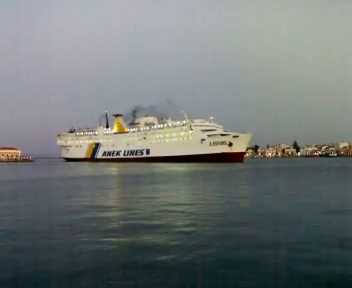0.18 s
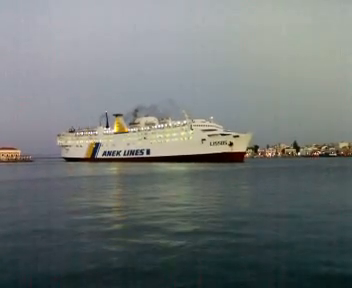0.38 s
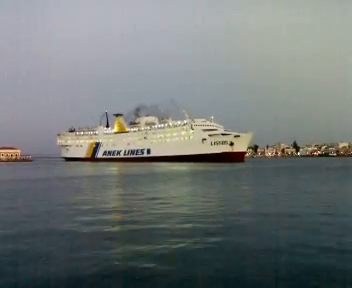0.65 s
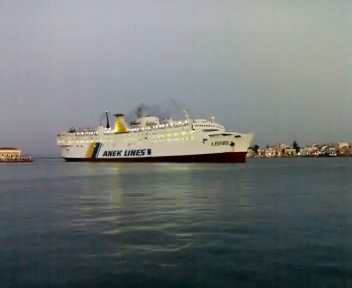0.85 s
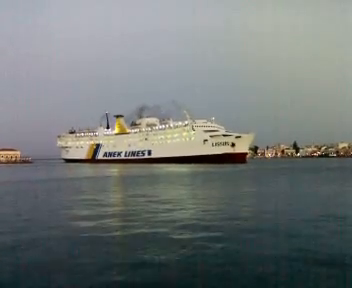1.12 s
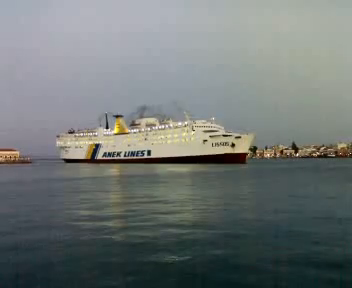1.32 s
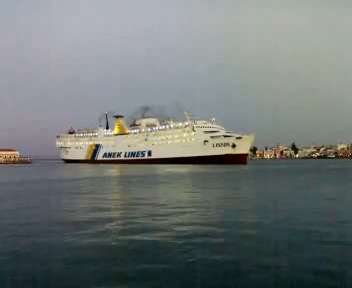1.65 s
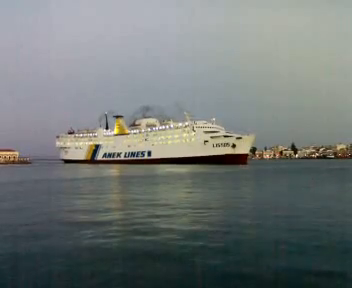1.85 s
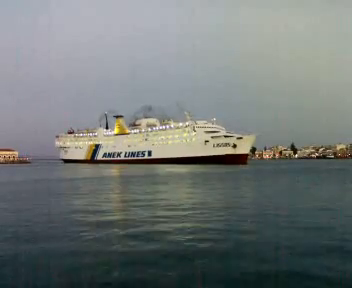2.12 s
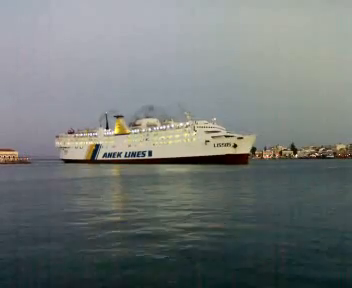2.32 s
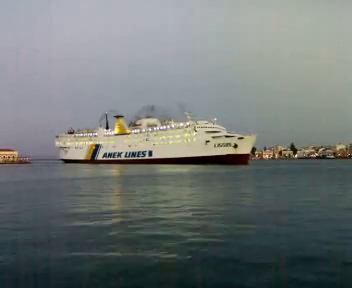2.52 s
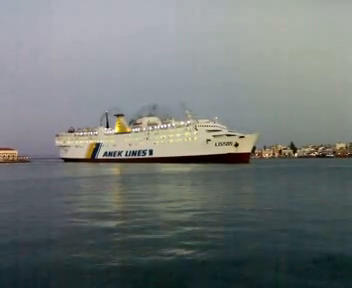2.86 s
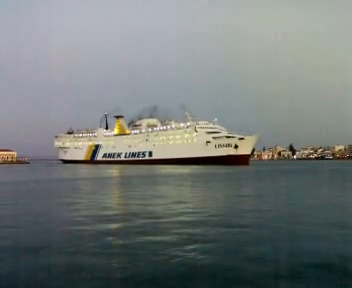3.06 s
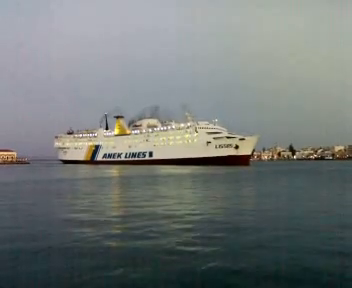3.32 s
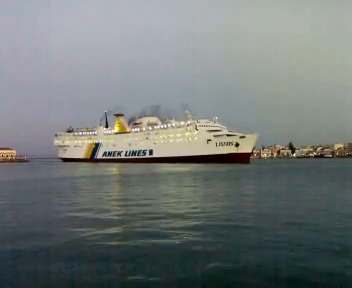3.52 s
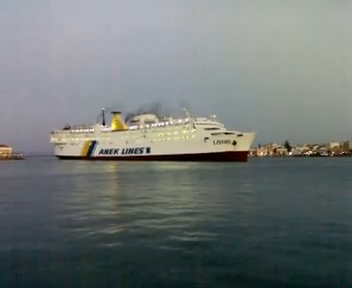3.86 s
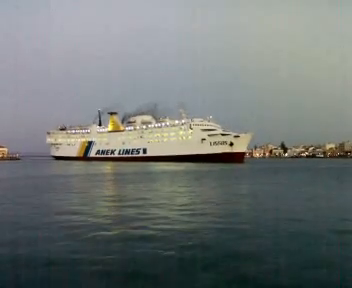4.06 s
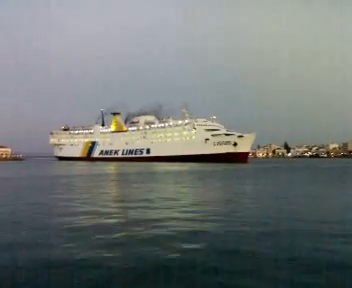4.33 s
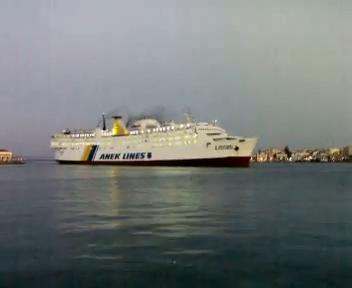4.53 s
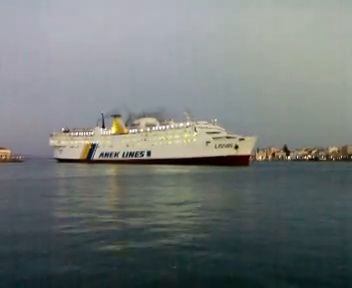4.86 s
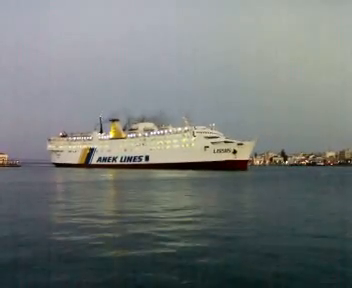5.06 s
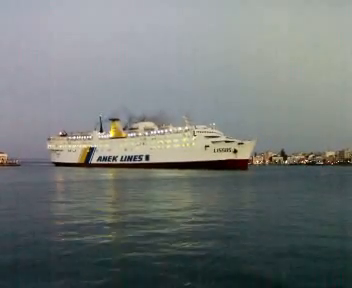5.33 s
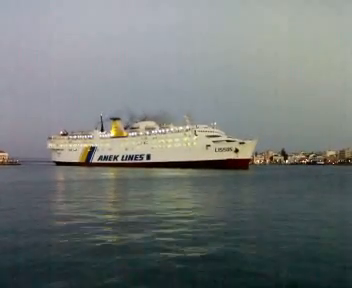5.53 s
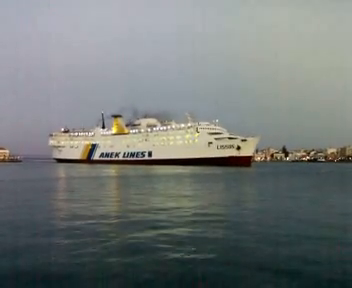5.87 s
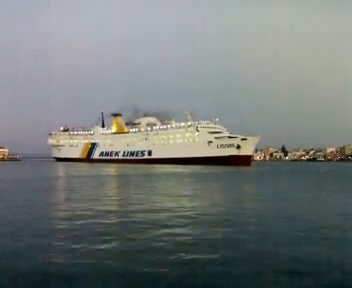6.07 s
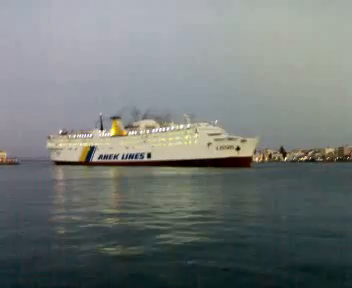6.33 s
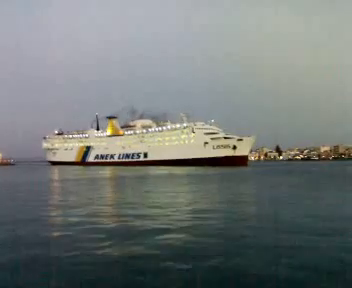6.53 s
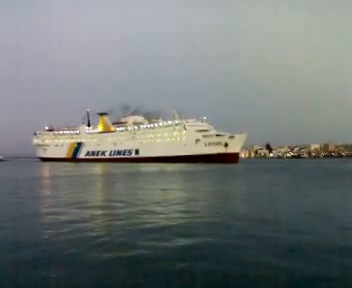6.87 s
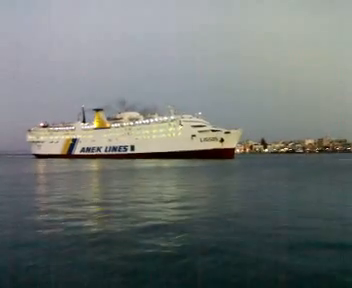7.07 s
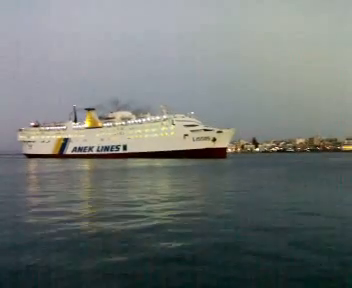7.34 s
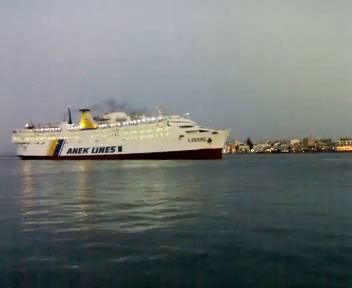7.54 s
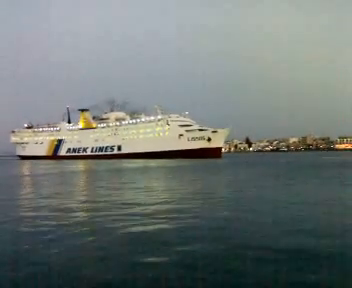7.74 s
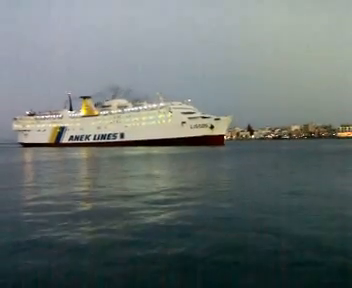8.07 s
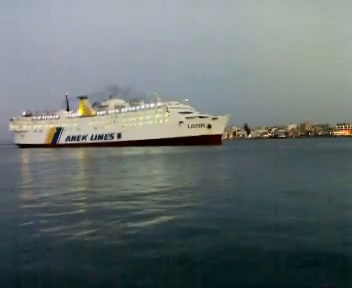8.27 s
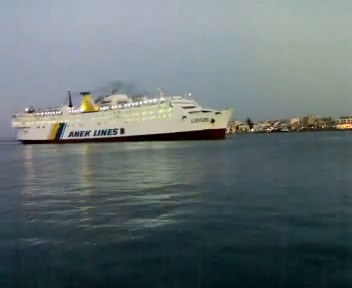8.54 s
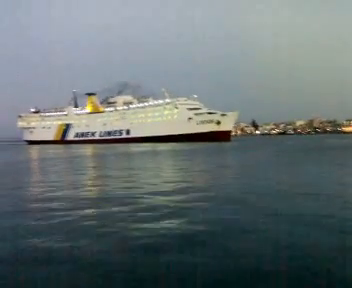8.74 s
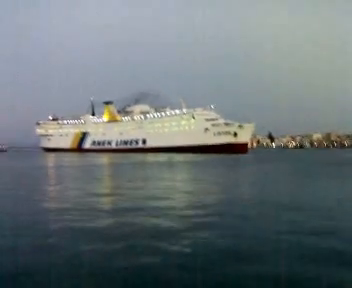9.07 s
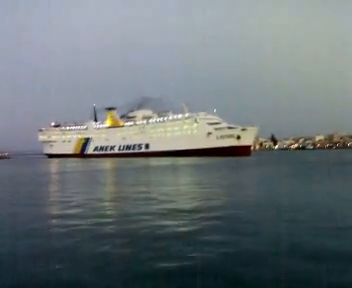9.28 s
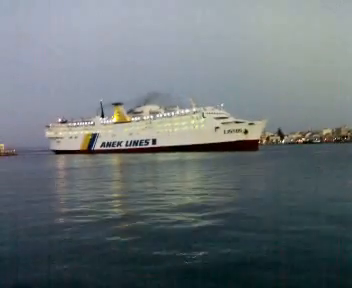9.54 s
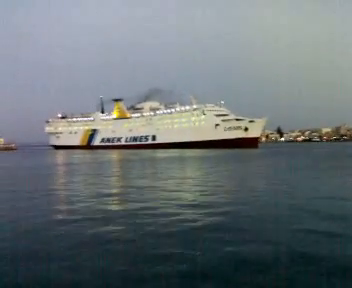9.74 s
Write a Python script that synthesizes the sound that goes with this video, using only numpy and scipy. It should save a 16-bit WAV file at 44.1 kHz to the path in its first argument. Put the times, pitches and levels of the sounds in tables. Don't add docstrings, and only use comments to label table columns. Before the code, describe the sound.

Deep wavering ship engine rumble under dull road roar, a passing vehicle's whine and brake squeal, brief swift calls, lapping clucks and microphone buffeting.

```python
import sys
import numpy as np
from scipy import signal
from scipy.fft import rfft, irfft, next_fast_len
from scipy.io import wavfile
from scipy.ndimage import uniform_filter1d

SR = 44100
rng = np.random.default_rng(int(sys.argv[2]) if len(sys.argv) > 2 else 0)


def put_to_file(sound):
    columns = np.atleast_2d(sound).T
    safe = np.clip(columns, -1, 1)
    whole_steps = np.round(safe * 32767)
    wavfile.write(sys.argv[1], SR, whole_steps.astype(np.int16))


def voltage_ratio(decibels):
    exponent = np.asarray(decibels, float) / 20
    return 10 ** exponent


N = 436590
TIME = np.arange(N) / SR

# (time [s], roar level [dB], brightness [dB])
TRAFFIC_NEARNESS = [(0, -35, -1), (1.7, -34.5, 1.5), (2.1, -33, 1.2), (2.58, -33.3, .5), (2.68, -32.3, 2.5),
                    (3.3, -31.3, 2), (3.55, -31.7, .5), (4.2, -30.8, .5), (4.7, -33.5, 1), (5.5, -33, .5),
                    (6.0, -33.5, .8), (6.7, -33, .5), (7.3, -35, -1), (7.7, -34.5, -3.3), (8.9, -34, -4.2),
                    (9.9, -33.8, -4.6)]


def curve(table):
    s, *columns = np.transpose(table)
    return [np.interp(TIME, s, column) for column in columns]


def walk(rate_hz, count=N, size=None):
    steps = np.repeat(rng.standard_normal(int(count * rate_hz / SR) + 2), 8)
    slewed = uniform_filter1d(uniform_filter1d(steps, size=8), size=8)
    position = np.arange(size or count) * 8 * rate_hz / SR
    return 1.3 * np.interp(position, np.arange(len(slewed)), slewed)


def bands(shape, flicker_db, rate_hz):
    size = next_fast_len(N)
    hz, db = np.transpose(shape)
    octave = np.log2(np.maximum(np.arange(size // 2 + 1) * SR / size, 1))
    colour = voltage_ratio(np.interp(octave, np.log2(hz), db, left=-99, right=-99))
    spectrum = rfft(rng.standard_normal(size)) * colour
    spectrum /= np.std(irfft(spectrum, size))
    for mid in np.arange(np.log2(hz[0]), np.log2(hz[-1]) + .5, .5):
        share = np.clip(1 - 2 * abs(octave - mid), 0, 1)
        yield 2 ** mid, irfft(spectrum * share, size)[:N] * voltage_ratio(flicker_db * walk(rate_hz))


def sine(hz):
    return np.sqrt(2) * np.sin(2 * np.pi * (np.cumsum(hz) / SR + rng.random()))


def ragged(hz, width_hz, clean_hz):
    rough = width_hz ** 2 / (width_hz ** 2 + clean_hz ** 2)
    real, imag = [walk(1.5 * width_hz, count=3 * SR, size=len(hz)) for _ in range(2)]
    envelope = np.sqrt(1 - rough) + np.sqrt(rough / 2) * (real + 1j * imag)
    carrier = np.exp(2j * np.pi * (np.cumsum(hz) / SR + rng.random()))
    return np.sqrt(2) * np.real(envelope * carrier)


def swells(table, width_hz=0, share=0, climb_hz_per_s=0, clean_hz=28):
    out = np.zeros(N + 3 * SR)
    for start_s, length_s, hz, db in table:
        i, n = int(start_s * SR), int(length_s * SR)
        track_hz = hz + climb_hz_per_s * np.arange(n) / SR
        tone = ragged(track_hz, width_hz + share * hz, clean_hz)
        out[i:i + n] += voltage_ratio(db) * tone * signal.windows.tukey(n, .2)
    return out[:N]


def pops(table, sag=0):
    out = np.zeros(N)
    for s, db, hz, cycles in table:
        i = np.arange(int((s - .05) * SR), int((s + .05) * SR))
        turns = (i / SR - s) * hz
        stretch = 1 + sag * abs(turns)
        turns = np.where(turns > 0, turns / np.sqrt(stretch), turns * stretch)
        out[i] -= voltage_ratio(db) * np.sin(2 * np.pi * turns) * np.exp(-(2 * turns / cycles) ** 2)
    return out


def swifts():
    calls = [(5.6, .08, 6120, 300, -58), (5.67, .13, 6250, 150, -64), (6.18, .155, 6130, -480, -59),
             (6.335, .08, 6110, 150, -55.5), (6.385, .11, 5800, 1000, -64), (6.778, .042, 6300, 1300, -59),
             (6.805, .08, 6390, 60, -64), (6.86, .09, 6140, 130, -56.5), (6.96, .05, 6370, 300, -67),
             (7.11, .065, 5850, 300, -63), (7.13, .05, 5300, 60, -68), (6.96, .145, 4215, -50, -54.5),
             (7.18, .11, 4200, 30, -63)]
    scoop_s, sag_s, tremble_hz = .024, .04, 26
    out = np.zeros(N)
    for start_s, length_s, hz, scoop_hz, db in calls:
        i, n = int(start_s * SR), int(length_s * SR)
        age_s = np.arange(n) / SR
        fall = (scoop_hz < 0) * np.exp((age_s - length_s) / sag_s)
        track_hz = hz - abs(scoop_hz) * (np.exp(-age_s / scoop_s) + fall)
        track_hz = track_hz + tremble_hz * walk(80, count=SR, size=n)
        level = voltage_ratio(db + 1.8 * walk(60, count=SR, size=n))
        out[i:i + n] += level * sine(track_hz) * signal.windows.tukey(n, .4)
    return out


def road():
    # (frequency [Hz], density [dB per Hz])
    roar_shape = [(250, -24), (420, -2), (573, -6), (727, 0), (1230, -4), (1350, -2), (1720, -2.5),
                  (3010, -17.3), (3600, -25), (4850, -27.5), (5270, -33), (5660, -32.5), (6080, -29.5),
                  (7270, -40.5), (9450, -65), (16000, -120)]
    level_db, bright_db = curve(TRAFFIC_NEARNESS)
    shift_db = .3 * walk(4)
    corners = np.log([1000, 1980, 4000, 7500])
    out = 0
    for hz, band in bands(roar_shape, flicker_db=.7, rate_hz=9):
        middle = np.interp(np.log(hz), corners, [0, .97, 0, .29])
        hiss = np.interp(np.log(hz), corners, [0, .45, .9, 1.4])
        out = out + band * voltage_ratio(middle * shift_db + hiss * bright_db)
    return voltage_ratio(level_db + 2.7) * out


def tyres_and_noise():
    # (start [s], length [s], centre [Hz], level [dB rms])
    resonances = [(2.5, 2.1, 690, -44), (2.8, 1.8, 1330, -42), (5, 1.8, 1100, -47), (0, 2.9, 1390, -46),
                  (0, 2.2, 1770, -47), (0, 3, 2090, -47), (1.9, 1.55, 1740, -44), (4.0, .6, 1700, -44),
                  (4.5, 2.7, 2080, -50), (8.5, .5, 335, -42), (7.8, 2.1, 1500, -46), (9.0, .9, 1580, -45)]
    # (start [s], length [s], centre [Hz], level [dB rms])
    broad_bands = [(2.62, .3, 4050, -54), (2.62, .45, 2700, -48), (1.43, .1, 3400, -54), (1.52, .13, 2150, -44),
                   (2.36, .12, 2500, -47), (6.48, .2, 1350, -40), (6.8, .16, 1050, -40), (2.9, .6, 6500, -62),
                   (0, 2.7, 1900, -47), (0, 2.7, 4800, -64), (0, 2.8, 6700, -63), (2.4, 2.2, 6800, -62),
                   (0, 2.9, 3700, -63), (4.4, 2.8, 3700, -59), (4.4, 2.6, 2300, -51), (7.2, 2.7, 2400, -51),
                   (7.2, 2.7, 1220, -45), (7.2, 2.7, 1850, -48), (7.3, 2.6, 4500, -66), (7.3, 2.6, 6700, -67),
                   (4.4, 2.6, 7200, -65)]
    return swells(resonances, share=.09) + swells(broad_bands, share=.2)


def engine_and_drive():
    # (start [s], length [s], pitch [Hz], level [dB rms])
    engine = [(2.75, .45, 437, -42.5), (3.66, .66, 441.5, -40.5), (4.3, .35, 441, -48),
              (3.1, 1.1, 220, -43), (5.65, 1.5, 444, -51)]
    # (start [s], length [s], pitch [Hz], level [dB rms])
    shafts = [(3.0, .3, 1353, -42), (3.8, .7, 965, -42), (3.8, .6, 1140, -45), (5.5, .6, 778, -42.5)]
    return swells(engine, width_hz=4, clean_hz=14) + swells(shafts, width_hz=9)


def gear_whine():
    # (time [s], pitch [Hz], level [dB rms])
    speed = [(2.88, 662, -52), (2.96, 674, -37), (3.2, 681, -37.5), (3.45, 676, -40), (3.65, 694, -37),
             (3.95, 688, -35.5), (4.15, 680, -40), (4.35, 664, -42), (4.6, 658, -55)]
    throb_hz, throb_from_s, throb_db, slip_hz = 11.8, 2.995, 4.5, 12
    width_hz, octave_db = 4, -8
    hz, db = curve(speed)
    turn = 2 * np.pi * throb_hz * (TIME - throb_from_s)
    hz = hz - slip_hz * np.sin(turn)
    db = db + throb_db * (np.cos(turn) - .35)
    near = (TIME > speed[0][0]) & (TIME < speed[-1][0])
    mesh = ragged(hz[near], width_hz, clean_hz=28)
    octave = ragged(2 * hz[near], 2 * width_hz, clean_hz=28)
    out = np.zeros(N)
    out[near] = voltage_ratio(db[near]) * (mesh + voltage_ratio(octave_db) * octave)
    return out


def brakes():
    # (start [s], length [s], mode [Hz], level [dB rms])
    squeals = [(5.65, .13, 2150, -44), (5.74, .41, 2192, -41), (6.22, .15, 2190, -43.5),
               (6.47, .31, 2218, -43.5), (3.88, .2, 2190, -47), (5.36, .18, 2192, -46),
               (5.46, .2, 4516, -61.5), (5.6, .38, 4524, -57.5), (4.95, .2, 4560, -65),
               (6.26, .09, 4525, -62), (6.45, .13, 4555, -61), (4.98, .14, 3000, -51.5),
               (5.82, .15, 3016, -53), (6.04, .12, 3018, -52.5), (6.5, .17, 3030, -57.5),
               (4.3, .35, 3012, -56.5), (5.44, .3, 3008, -59)]
    # (start [s], length [s], mode [Hz], level [dB rms])
    drags = [(3.8, 1.9, 2185, -48.5), (5.65, 1.15, 2200, -50), (3.95, .4, 2975, -52.5),
             (3.9, 1.5, 3000, -58), (5.4, 1.3, 3010, -55.5), (4.9, .6, 4530, -64), (6.2, .7, 4530, -66)]
    climb = 14
    return swells(squeals, width_hz=7, climb_hz_per_s=climb) + swells(drags, width_hz=32, climb_hz_per_s=climb)


def clucks_and_clicks():
    # (time [s], peak [dB], pitch [Hz], length [cycles])
    laps = [(.33, -36, 2600, 4), (.649, -34, 2600, 4), (.744, -36, 2600, 4), (1.502, -23, 1600, 3),
            (1.592, -43, 3700, 4), (1.612, -32, 2600, 4), (1.912, -34, 2600, 4), (2.415, -31, 2600, 4),
            (2.731, -30, 2600, 4), (2.83, -29, 2600, 4), (3.815, -36, 2900, 6), (4.096, -30, 2500, 4),
            (4.289, -30, 2500, 4), (6.62, -22, 1700, 3), (7.293, -42, 3900, 4), (7.489, -34, 2600, 4),
            (8.053, -25, 1500, 3), (8.274, -35, 2600, 4), (8.83, -24, 1500, 3), (9.138, -26, 1300, 3),
            (9.319, -34, 2500, 4), (9.473, -35, 2500, 4)]
    return pops(laps)


def wind():
    # (time [s], level [dB])
    breeze = [(0, -30), (.3, -33), (1.4, -30), (2.3, -30.5), (2.8, -34), (3.4, -30), (4.0, -33.5),
              (4.5, -32), (5.2, -34), (5.7, -29.5), (7.0, -27), (7.4, -27), (7.6, -34), (8.2, -24.5),
              (8.45, -29), (8.8, -27.5), (9.2, -30), (9.9, -31.5)]
    # (frequency [Hz], density [dB per Hz])
    buffet_shape = [(8, -39), (16, -7.5), (30, -6), (60, -4.5), (100, -7.5), (160, -22), (250, -46)]
    # (time [s], peak [dB], pitch [Hz], length [cycles])
    slaps = [(6.991, -14, 60, 1), (7.101, -12, 120, 1), (7.51, -17, 70, 1), (8.107, -15, 150, 1),
             (8.152, -14, 80, 1.5), (8.296, -13, 120, 1), (8.306, -14, 280, 1.5), (8.79, -17, 95, 2),
             (8.134, -16, 110, 1), (8.575, -20, 110, 1), (8.6096, -18.5, 155, 5)]
    # (time [s], peak [dB], pitch [Hz], length [cycles])
    knock = [(8.5967, -7.5, 440, 1.0)]
    eddies = sum(band for _, band in bands(buffet_shape, flicker_db=1.1, rate_hz=10))
    level = voltage_ratio(curve(breeze)[0] - 2.0 + .8 * walk(5))
    return level * eddies + pops(slaps) + pops(knock, sag=.8)


def fingers():
    # (time [s], level [dB], colour [Hz], decay [ms])
    ticks = [(1.785, -50, 6300, 25), (4.99, -54, 6400, 10), (5.466, -47, 6000, 8), (6.42, -55, 6600, 15),
             (6.622, -44, 3600, 5), (7.285, -57, 5800, 20), (9.065, -56, 6500, 20), (9.085, -54, 4200, 15)]
    # (time [s], peak [dB], pitch [Hz], length [cycles])
    snaps = [(8.761, -38, 3300, 2.5), (8.762, -46, 4700, 4), (8.814, -44, 4200, 8), (8.885, -44, 6700, 13),
             (8.885, -47, 4000, 6), (8.887, -22, 1600, 4), (8.899, -24, 1450, 3), (8.902, -25, 2300, 3),
             (8.9022, -31, 3100, 2.5), (8.9022, -39, 4500, 2.5), (8.903, -44, 6600, 4),
             (8.9225, -40, 4200, 7), (8.92, -43, 3500, 4), (8.923, -33, 2600, 3), (8.923, -49, 6700, 10),
             (9.086, -45, 3900, 7), (9.093, -45, 4400, 8), (9.127, -42, 3900, 3.5), (9.133, -41.5, 6300, 7),
             (9.137, -43.5, 6400, 7), (9.133, -35, 2900, 4), (9.137, -35, 2800, 4)]
    crack_db, crack_s = -15, .0012
    out = np.zeros(N)
    age_s = np.arange(4096) / SR
    for s, db, hz, decay_ms in ticks:
        noise = rng.standard_normal(len(age_s))
        narrow = signal.butter(2, [hz / 1.12, hz * 1.12], "band", fs=SR, output="sos")
        wide = signal.butter(2, [hz / 1.5, hz * 1.5], "band", fs=SR, output="sos")
        scratch = signal.sosfilt(narrow, noise * np.exp(-1000 * age_s / decay_ms))
        crack = signal.sosfilt(wide, noise * np.exp(-age_s / crack_s))
        touch = scratch + voltage_ratio(crack_db) * crack
        out[int(s * SR):][:len(age_s)] += voltage_ratio(db + 2.0) * np.sqrt(SR / hz) * touch
    return out + pops(snaps)


def ferry():
    # (pitch [Hz], level [dB rms], fading [dB])
    diesel = [(31.6, -46, 2), (48.4, -47, 2), (60.6, -43, 2), (74.7, -38, 1), (103, -43, 2),
              (144.7, -46, 2), (148.2, -41.5, 1.5), (156.8, -45, 2), (163.2, -44, 1.5), (199.2, -47, 2),
              (265.8, -49, 2), (304.8, -50, 2), (326.2, -47.5, 1.5), (358, -55, 2)]
    # (start [s], length [s], pitch [Hz], level [dB rms])
    surges = [(0, .7, 163, -36), (.6, .7, 163.2, -35.5), (1.9, 1.6, 147.5, -40), (3.7, 1.0, 149.5, -39.5),
              (5.45, .5, 148, -37), (8.5, .4, 146, -37), (3.1, .4, 218, -37), (1.6, .8, 214, -41),
              (.1, .35, 124, -35), (1.15, .75, 128, -36.5), (3.9, 1.3, 69.3, -34.5), (3.5, 1.6, 75.5, -39),
              (5.3, .8, 69, -39), (4.2, 1.8, 35, -41), (5.4, 1.5, 60.6, -40), (5.9, 1.3, 199, -41),
              (6.7, .75, 358, -46), (8.2, 1.2, 358, -45), (4.6, .45, 326, -39.5), (1.9, .9, 326, -43),
              (3.1, .5, 326, -46), (8.1, 1.4, 325, -43.5), (8.2, 1.7, 103.5, -40.5), (8.5, 1.4, 144.7, -43),
              (.15, .3, 151, -36), (.55, .4, 403, -45), (2.7, .3, 156, -35), (4.35, .3, 146, -36),
              (1.9, .5, 66, -37), (.6, 1.0, 65, -39), (5.3, .25, 190, -36), (6.15, .3, 201, -37),
              (6.8, .35, 98, -34), (6.8, .8, 75, -38), (7.2, .5, 152, -37), (9.25, .3, 147, -38),
              (9.65, .25, 161, -37), (8.9, .4, 70, -38), (5.5, .7, 75, -38)]
    # (time [s], level [dB])
    load = [(0, -29), (1.2, -28), (1.8, -29.5), (2.2, -27), (5.0, -27.5), (7.2, -26.5), (9.9, -27.5)]
    # (frequency [Hz], density [dB per Hz])
    rumble_shape = [(50, -32), (80, -8), (110, -2), (160, -1.5), (230, -3), (330, -6.3), (450, -15.5),
                    (600, -26.5), (800, -43)]
    tones = swells(surges, width_hz=1.6, clean_hz=6)
    for hz, db, fade_db in diesel:
        level = voltage_ratio(db + fade_db * walk(1.5))
        tones += level * sine(hz * (1 + .002 * walk(1)))
    rumble = sum(band for _, band in bands(rumble_shape, flicker_db=1.0, rate_hz=6))
    return tones + voltage_ratio(curve(load)[0] - 2.1 + .6 * walk(3)) * rumble


def scene():
    vehicle = tyres_and_noise() + engine_and_drive() + gear_whine() + brakes()
    near = clucks_and_clicks() + wind() + fingers()
    return (swifts() + road() + vehicle + near + ferry())[None]


def clock_whine():
    # (multiple of the clock rate [-], level [dB rms])
    overtones = [(8, -64), (9, -68), (16, -74.5), (17, -68), (18, -72), (19, -68.5), (20, -68), (21, -72.5),
                 (22, -84), (23, -82.5), (24, -85.5), (25, -86.5)]
    clock_hz = 292.97
    return sum(voltage_ratio(db) * np.sqrt(2) * np.cos(2 * np.pi * k * clock_hz * TIME) for k, db in overtones)


def camera_edge(x):
    # (time [s], frequency [Hz])
    slivers = [(.4, 7480), (1.8, 7560), (2.25, 7530), (5.0, 7530), (6.35, 7560), (7.35, 7480), (7.75, 7610),
               (8.0, 7610), (8.7, 7610), (9.67, 7610), (9.8, 7610)]
    top_hz, scatter_hz, top_hz_per_db = 7400, 50, 16
    hz, s, z = signal.stft(x, SR, nperseg=4096, noverlap=2048)
    hz = hz[:, None]
    bright_db = np.interp(s, *np.transpose(TRAFFIC_NEARNESS)[::2])
    keep = hz < top_hz + top_hz_per_db * bright_db + scatter_hz * rng.standard_normal(len(s))
    for when_s, sliver_hz in slivers:
        keep |= (abs(hz - sliver_hz) < 40) & (abs(s - when_s) < .045)
    return signal.istft(z * keep, SR, nperseg=4096, noverlap=2048)[1][..., :N]


def sampling_mirror(x):
    camera_sr_hz, mirror_db = 16000, -21.5
    high = signal.butter(8, 6800, "high", fs=SR, output="sos")
    leak = signal.butter(2, [8200, 8720], "band", fs=SR, output="sos")
    folded = 2 * signal.sosfilt(high, x) * np.cos(2 * np.pi * camera_sr_hz * TIME)
    return voltage_ratio(mirror_db) * signal.sosfilt(leak, folded)


def band_limit(x):
    return signal.sosfilt(signal.butter(12, 9130, fs=SR, output="sos"), x)


def record(dry):
    heard = camera_edge(dry + clock_whine())
    offset = -.081
    return band_limit(heard + sampling_mirror(heard) + offset)


dry = scene()
out = record(dry)
put_to_file(out)
```